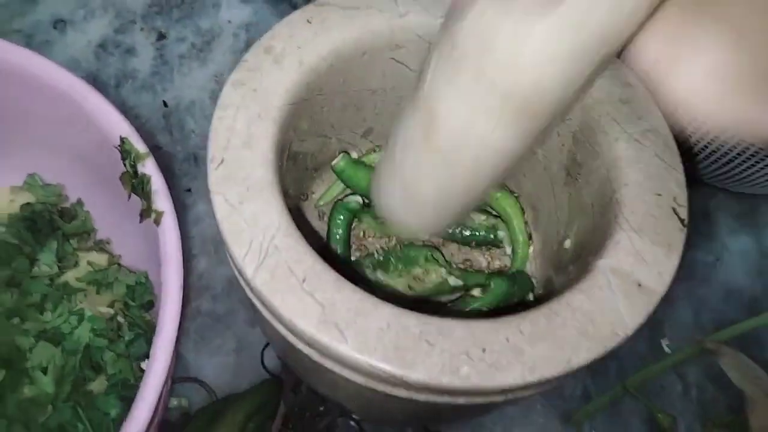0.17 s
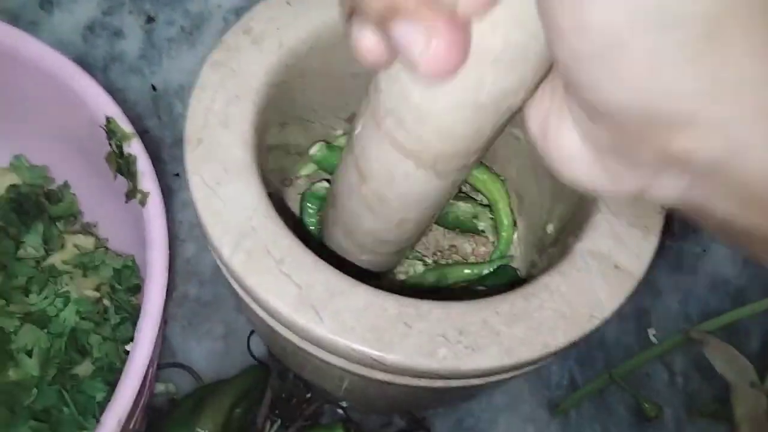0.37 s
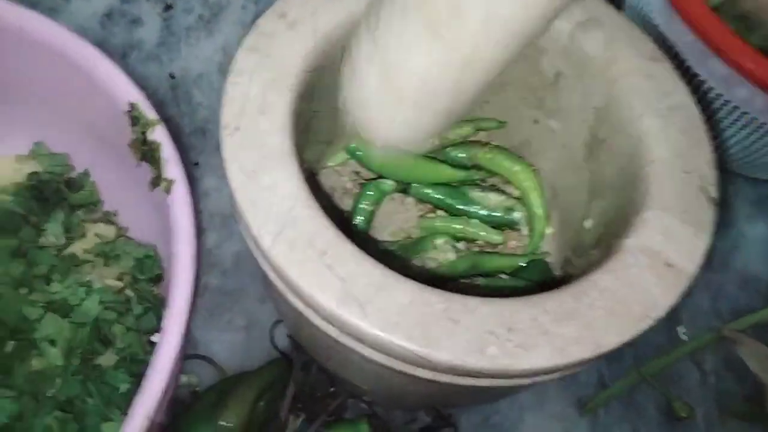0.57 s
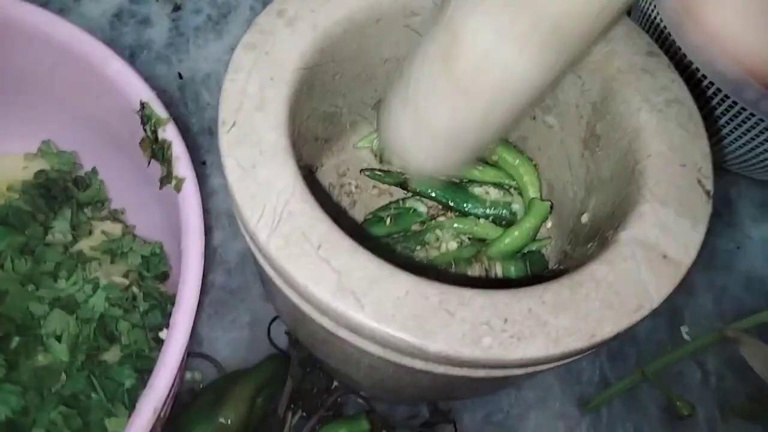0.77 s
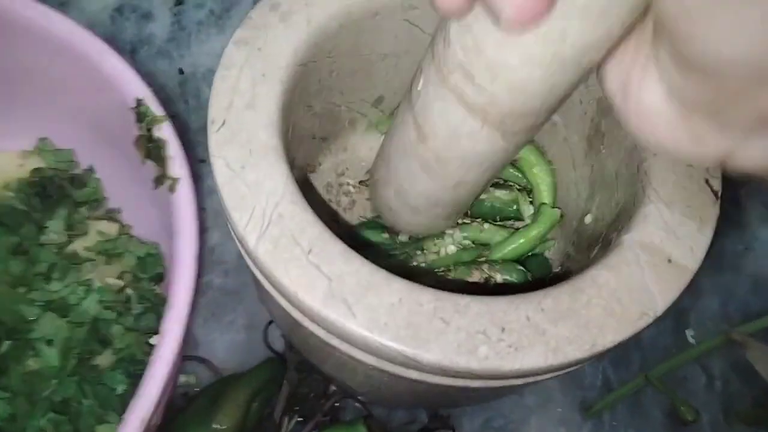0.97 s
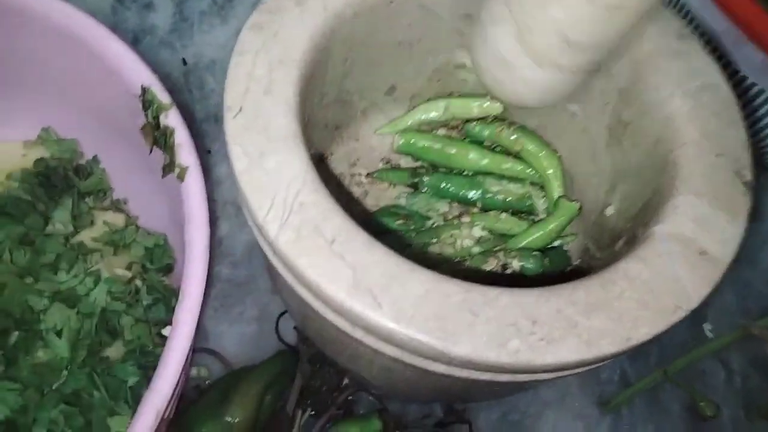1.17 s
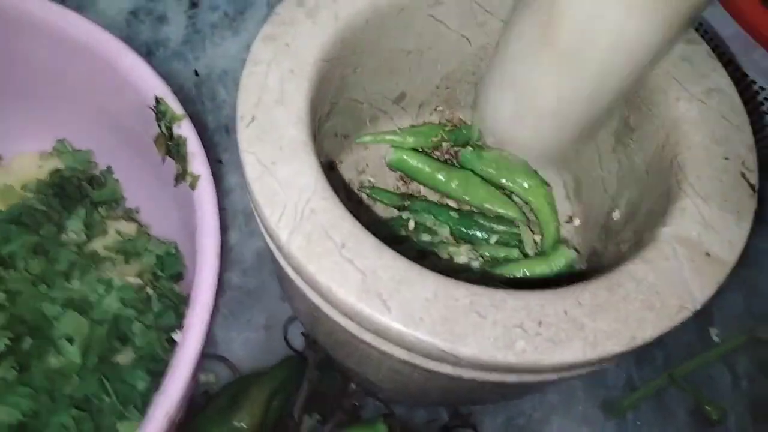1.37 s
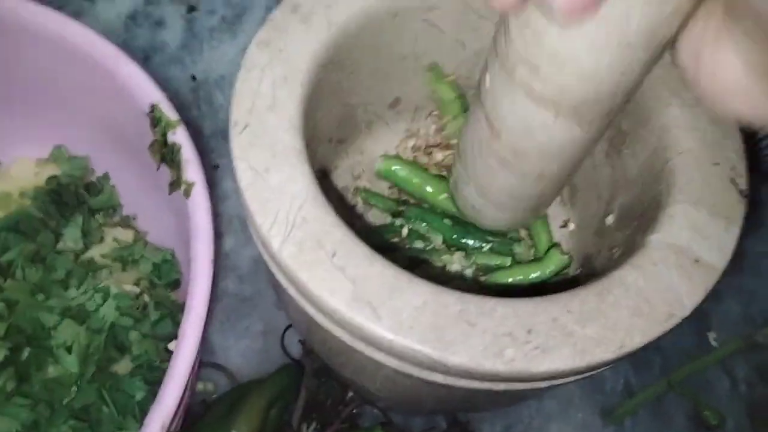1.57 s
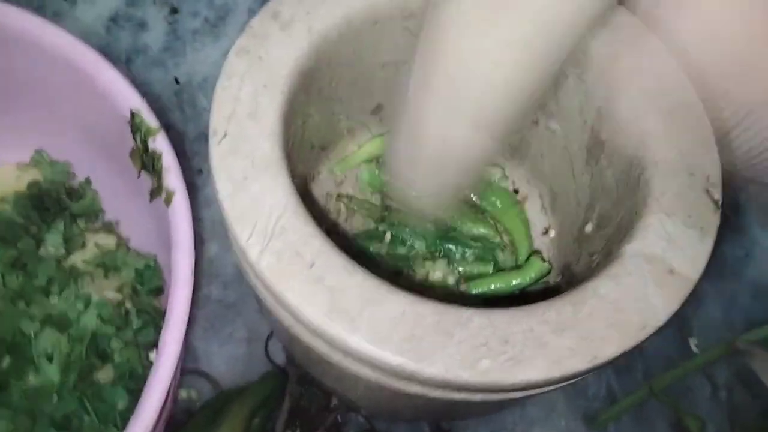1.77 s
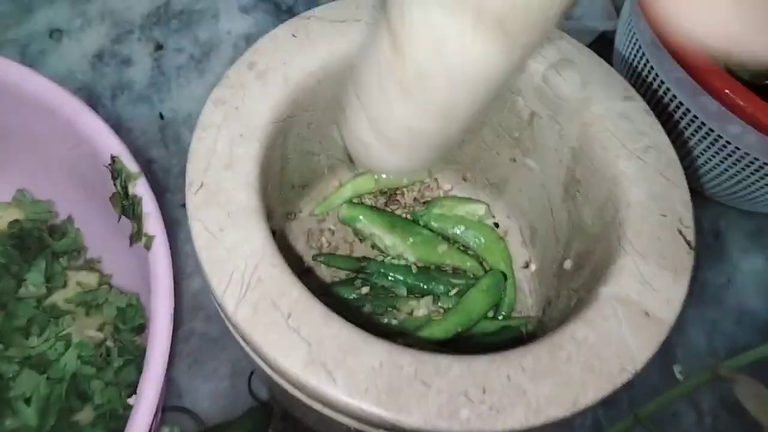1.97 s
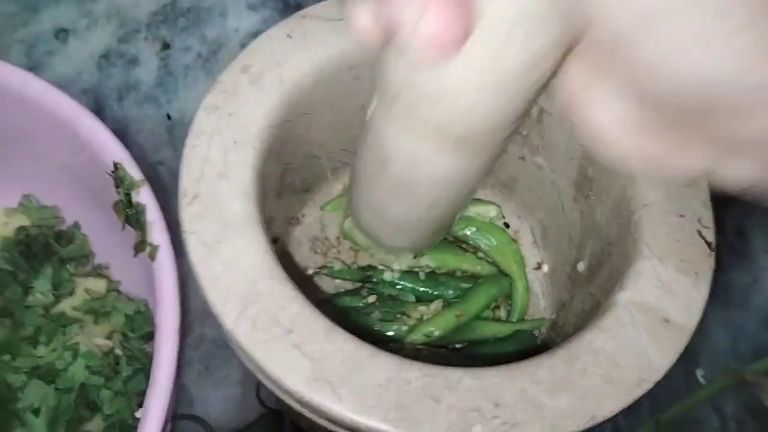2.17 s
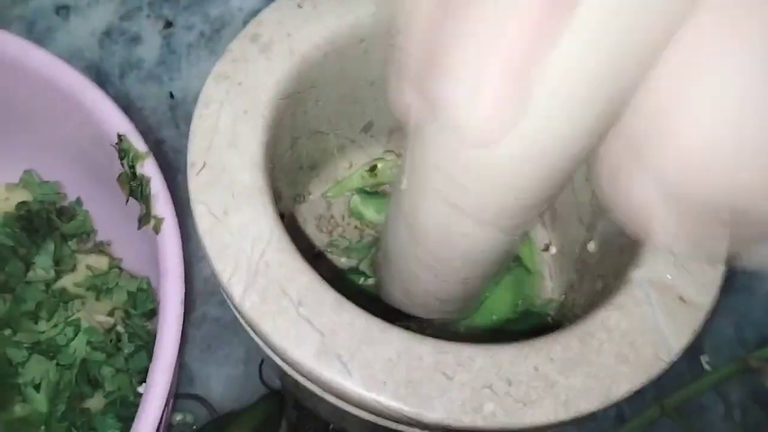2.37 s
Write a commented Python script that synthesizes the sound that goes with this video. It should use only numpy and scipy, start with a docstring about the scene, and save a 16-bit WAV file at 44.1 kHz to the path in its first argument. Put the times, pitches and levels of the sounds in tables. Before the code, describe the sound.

Steady pounding of a stone pestle crushing crunchy chillies in a mortar in a kitchen.

```python
"""A stone pestle pounds green chillies in a stone mortar, about three and a half blows a second.
A hard-walled kitchen rumbles softly, still ringing from an earlier blow, with thin whistles far off.
The first blow lands stone on stone; the rest are cushioned, a wet crunch in the bowl and a low thud
through the floor. After the second the mortar rocks on its base. Later the pestle clips the bowl's wall,
faintly at first, then with a clear ring until the chillies damp it, and the mortar rocks again."""
import sys
import numpy as np
from scipy import signal
from scipy.fft import rfft, irfft, next_fast_len
from scipy.io import wavfile
from scipy.ndimage import map_coordinates

SR = 44100
rng = np.random.default_rng(int(sys.argv[2]) if len(sys.argv) > 2 else 0)


def dump_mix(stems):
    """Bounce the given channels to the path in sys.argv[1] as a 16-bit WAV at rate SR."""
    frames = np.atleast_2d(stems).T  # one column per channel
    limited = np.clip(frames, -1, 1)  # hard clip at full scale
    pcm = np.round(limited * 32767).astype(np.int16)
    wavfile.write(sys.argv[1], SR, pcm)


N = 110250

# snapping chilli skins as the bowl colours them: (frequency [Hz], level [dB])
SKIN_EQ = [(1000, -72), (3400, -18.5), (6000, -7), (7200, -4.5), (8000, 1), (8750, 3.5), (9600, -3.5),
           (11000, -12.5), (13000, -19), (15500, -13.5)]


def amp(db):
    """Decibels to gain."""
    return 10 ** (np.asarray(db) / 20)


def along(points, hz):
    """Read a curve of (frequency, value) points on a log frequency axis."""
    freqs, values = np.transpose(points)
    return np.interp(np.log(hz + 1), np.log(freqs + 1), values)


def fade(t, t60):
    """Exponential decay, silent before time zero."""
    return (t >= 0) * np.exp(-np.log(1000) * np.maximum(t, 0) / t60)


def since(onset):
    """Seconds since the onset, for every sample."""
    return np.arange(N) / SR - onset


def burst(x):
    """Scale a short sound to the energy of 10 ms at full level."""
    return x * np.sqrt(SR / 100 / (np.sum(x ** 2) + 1e-20))


def colour(x, eq, size=2048):
    """Minimum-phase EQ: nothing rings ahead of an attack."""
    gain = amp(along(eq, np.fft.rfftfreq(size, 1 / SR)))
    cepstrum = irfft(np.log(gain))
    cepstrum[1:size // 2] *= 2
    cepstrum[size // 2 + 1:] = 0
    return signal.oaconvolve(x, irfft(np.exp(rfft(cepstrum))))[:N]


def ring(t, modes):
    """Damped sines that start at time zero."""
    return sum(amp(db) * fade(t, t60) * np.sin(2 * np.pi * hz * t) for hz, db, t60 in modes)


def puff(t, t60, eq):
    """A short burst of coloured contact noise."""
    return burst(colour(rng.standard_normal(N) * fade(t, t60), eq))


def scattered(onset, eq):
    """A coloured click for the reverb send: a blow leaving in all directions, its detail averaged out."""
    return burst(colour(np.sinc(since(onset) * SR), eq))


def room(x):
    """Kitchen reverb: a fresh diffuse tail dying at its own speed in each band, and standing waves."""
    # decay between the hard walls: (frequency [Hz], t60 [s])
    reverb_times = [(100, 0.84), (400, 0.61), (900, 0.57), (2000, 0.61), (5000, 0.43), (9000, 0.47),
                    (15000, 0.53)]
    # standing waves: (frequency [Hz], level [dB], t60 [s])
    room_modes = [(132.5, -53, 0.57), (385, -60.5, 0.8), (670, -112, 0.95), (818, -58.5, 1)]
    hz, t, bands = signal.stft(rng.standard_normal(SR), SR, nperseg=256)
    bands = bands * fade(t, along(reverb_times, hz)[:, None])
    tail = signal.istft(bands, SR, nperseg=256)[1]
    t = np.arange(len(tail)) / SR
    tail *= 1 - np.exp(-(t / 0.0034) ** 2)  # reflections take a few ms to come back from the walls
    response = tail / np.linalg.norm(tail) + ring(t, room_modes)
    return signal.fftconvolve(x, response)[:N]


def ambience(level_db=-50.5, sway_db=2.5):
    """Low rumble and faint hiss of the house, gently wavering in level."""
    # room tone: (frequency [Hz], level [dB])
    house_eq = [(25, 6.5), (70, -10), (100, -5), (126, 1), (150, -8), (190, -3.5), (280, -20), (400, -9),
                (520, -19.5), (850, -18), (1100, -26.5), (2800, -32.5), (3800, -31), (4700, -39),
                (6500, -39), (8800, -31), (12000, -51), (15500, -47)]
    gain = amp(along(house_eq, np.fft.rfftfreq(N, 1 / SR)))
    noise = irfft(rfft(rng.standard_normal(N)) * gain, N)
    sway = map_coordinates(rng.standard_normal(size=24), [np.linspace(0, 23, N)])
    return amp(level_db + sway_db * sway) * noise / np.std(noise)


def earlier_crunch_tail(level_db=-52):
    """A dying hiss: the kitchen still rings from a blow just before the start."""
    hiss = colour(rng.standard_normal(N), SKIN_EQ)
    return amp(level_db) * fade(since(0), t60=0.41) * hiss / np.std(hiss)


def whistles(half_width_hz=107):
    """Faint notes, perhaps a bird, that swell and fade, blurred by distance into narrow noise bands."""
    # far-off whistles: (time [s], length [s], pitch [Hz], level [dB])
    notes = [(0.086, 0.36, 3720, -67), (0.721, 0.07, 3740, -68), (0.848, 0.25, 3740, -70),
             (0.898, 0.22, 2740, -69.5), (1.571, 0.078, 5150, -69), (1.744, 0.23, 3770, -73)]
    out = np.zeros(N)
    for onset, length, hz, db in notes:
        band = np.exp(-((np.fft.rfftfreq(N, 1 / SR) - hz) / half_width_hz) ** 2)
        note = irfft(rfft(rng.standard_normal(N)) * band, N)
        swell = np.sin(np.pi * np.clip(since(onset) / length, 0, 1))
        out += amp(db) * swell * note / np.std(note)
    return out


def chilli_blows():
    """Skins snap ever harder as the pestle sinks in; pulp squelches, bowl air rings, the floor thuds."""
    # blows on the chillies: (time [s], lead-in length [s], crunch [dB], rise [s], fall [s],
    # lead-in against the peak [dB], pulp [dB], bowl air [dB], thud [dB], floor boom send [dB])
    blows = [(0.211, 0.0079, -28.5, 0.0018, 0.00068, -15, -42, -45, -28, -40.5),
             (0.5114, 0.015, -25.5, 0.007, 0.0063, -14, -29, -31.5, -36, -48),
             (0.7962, 0.011, -24.5, 0.0021, 0.0049, -19.5, -32.5, -43, -30.5, -39),
             (1.0839, 0.012, -23, 0.0011, 0.0039, -10.5, -26.5, -35.5, -33.5, -41.5),
             (1.3674, 0.0073, -23, 0.0013, 0.0026, -28.5, -28.5, -37.5, -28, -43.5),
             (1.671, 0.0082, -25.5, .007, 0.0023, -9, -30, -30, -24, -46),
             (1.9467, 0.0074, -24.5, 0.00066, 0.0019, -40, -29, -42, -51, -61.5),
             (2.2347, 0.018, -30.5, 0.0016, 0.0016, -19, -36.5, -37, -25, -36)]
    # squashed pulp as the bowl colours it: (frequency [Hz], level [dB])
    pulp_eq = [(150, -5), (500, -19.5), (900, -14), (1400, -21.5), (2100, -9.5), (2550, -3.5), (3250, -7.5),
               (3950, -1.5), (5500, -1), (9000, -6)]
    # the floor's boom: (frequency [Hz], level [dB])
    floor_eq = [(40, -22.5), (125, 8.5), (220, 5.5), (420, -3), (550, -30), (720, -1), (1100, -22),
                (3000, -24)]
    snaps_per_s, snap_spread_db, juice_db, give_way_s = 1800, 6, 5, 0.014
    bowl_hz, bowl_t60_s = 887, 0.048
    thud_hz, thud_t60_s = 42, 0.069
    crunch_send_db, bowl_send_db, thud_send_db, boom_direct_db = -14, -6.5, -7.5, -7
    out = np.zeros(N)
    for onset, lead, skin_db, rise, fall, lead_db, pulp_db, bowl_db, thud_db, boom_db in blows:
        t = since(onset)
        peak = np.exp(-np.abs(t) / np.where(t < 0, rise, fall))
        # the skins give way softly before the pestle stops
        lead_in = amp(lead_db) * np.exp(-np.abs(t) / give_way_s) * (t < 0)
        pressure = (peak + lead_in) * (t > -lead)
        snapping = rng.random(N) < snaps_per_s / SR
        snaps = snapping * amp(snap_spread_db * rng.standard_normal(N)) * rng.choice([-1, 1], N)
        juice = amp(juice_db) * rng.standard_normal(N)
        grains = pressure * (snaps / np.std(snaps) + juice)
        bowl = ring(t + rise / 2, [(bowl_hz, bowl_db, bowl_t60_s)])
        thud = ring(t, [(thud_hz, thud_db, thud_t60_s)])
        boom = amp(boom_db) * puff(t, t60=0.031, eq=floor_eq)
        for db, eq in (skin_db, SKIN_EQ), (pulp_db, pulp_eq):
            out += amp(db) * burst(colour(grains, eq))
            out += amp(db + crunch_send_db) * room(scattered(onset, eq))
        out += bowl + thud + amp(boom_direct_db) * boom
        out += room(amp(bowl_send_db) * bowl + amp(thud_send_db) * thud + boom)
    return out


def stone_knock(crack_db=-5, send_db=-3.5):
    """Bare stone meets stone: a crack and the mortar's short ring up close, a duller boom off the walls."""
    # the bare hit: (time [s], level [dB])
    hits = [(0.2103, -17)]
    # the mortar's ring: (frequency [Hz], level [dB], t60 [s])
    mortar_modes = [(400, -25, .06), (875, 2, .07), (1120, -15, .025), (1600, -10, .014), (2060, -3, .014),
                    (2480, -5, .012), (3250, -8, .008)]
    # contact crack: (frequency [Hz], level [dB])
    crack_eq = [(200, -22), (800, -8), (2000, 0), (2700, -2), (3400, -9), (5000, -16), (9000, -23),
                (15000, -33)]
    # what the mortar's outside sends to the walls: (frequency [Hz], level [dB])
    outside_eq = [(120, -28), (290, -15), (390, -3), (520, -13), (640, -8), (760, -6), (850, 1), (1020, -9),
                  (1700, -12), (2400, -16), (3300, -24), (5000, -29), (9000, -35), (15000, -46)]
    out = np.zeros(N)
    for onset, db in hits:
        t = since(onset)
        crack = amp(crack_db) * puff(t, t60=0.012, eq=crack_eq)
        boom = amp(send_db) * room(scattered(onset, outside_eq))
        out += amp(db) * (ring(t, mortar_modes) + crack + boom)
    return out


def stone_presses(t60_s=0.044, send_db=-12.5):
    """The stone rings briefly, well damped, where the pestle presses it."""
    # notes of the pressed wall: (time [s], pitch [Hz], level [dB])
    notes = [(.509, 3970, -34), (1.083, 2490, -31), (1.084, 2000, -34), (1.367, 2120, -37),
             (1.667, 2000, -40), (2.233, 2150, -39)]
    direct = sum(ring(since(onset), [(hz, db, t60_s)]) for onset, hz, db in notes)
    return direct + amp(send_db) * room(direct)


def mortar_rocking(direct_db=-6.5):
    """The mortar settles on its base: dull, gritty clunks heard mostly by way of the walls."""
    # clunks: (time [s], clunk send [dB], grit send [dB])
    clunks = [(.5473, -33, -68), (0.573, -42.5, -71), (1.96, -40, -40), (2.0424, -41.5, -38.5)]
    # tone of the base: (frequency [Hz], level [dB])
    base_eq = [(120, -22), (260, -15), (400, -6), (520, -11), (640, -5), (740, -5), (840, 0), (1020, -9),
               (1500, -13), (2200, -24), (5000, -37)]
    out = np.zeros(N)
    for onset, db, grit_db in clunks:
        out += amp(db + direct_db) * puff(since(onset), t60=0.029, eq=base_eq)
        out += room(amp(db) * scattered(onset, base_eq) + amp(grit_db) * scattered(onset, SKIN_EQ))
    return out


def pestle_clinks(tick_db=-7, send_db=-11):
    """The pestle clips the bowl's wall with a tick and rings like a bar until the chillies damp it."""
    # glancing hits: (time [s], level [dB], time until damped [s])
    clinks = [(1.0565, -50.5, 0.013), (1.891, -25, 0.13)]
    # the free pestle: (frequency [Hz], level [dB], t60 [s])
    pestle_modes = [(1745, -5, 0.019), (2466, -0.5, 0.021), (4448, -0.5, 0.16), (7350, -19, 0.058),
                    (10400, -10.5, .05)]
    # contact tick: (frequency [Hz], level [dB])
    tick_eq = [(200, -16.5), (900, -4), (1750, -7), (2500, -5.5), (3300, -4.5), (4800, 7.5), (6200, -53),
               (8000, 5), (10500, -30), (13000, -30)]
    direct = np.zeros(N)
    for onset, db, free_s in clinks:
        t = since(onset)
        damping = fade(np.maximum(t - free_s, 0), t60=0.015)
        tick = amp(tick_db) * puff(t, t60=0.044, eq=tick_eq)
        direct += amp(db) * (ring(t, pestle_modes) * damping + tick)
    return direct + amp(send_db) * room(direct)


def scene():
    """The pounding and the background in one close mono mix."""
    pounding = chilli_blows() + stone_presses() + stone_knock() + mortar_rocking() + pestle_clinks()
    return (pounding + earlier_crunch_tail() + whistles() + ambience())[None]


def record(dry, cutoff_hz=15700):
    """A steep low-pass trims the very top."""
    size = next_fast_len(N + SR // 2)
    gain = 1 / (1 + (np.fft.rfftfreq(size, 1 / SR) / cutoff_hz) ** 80)
    return irfft(rfft(dry, size) * gain, size)[:, :N]


dry = scene()
out = record(dry)
dump_mix(out)
```